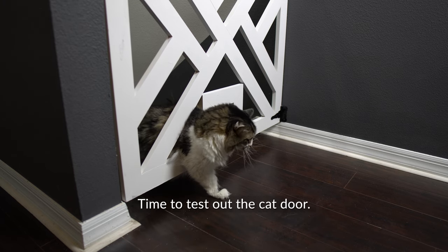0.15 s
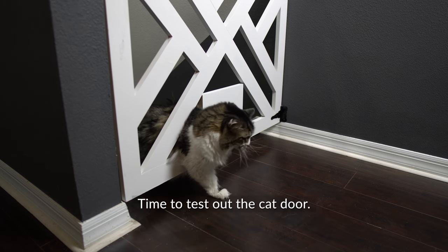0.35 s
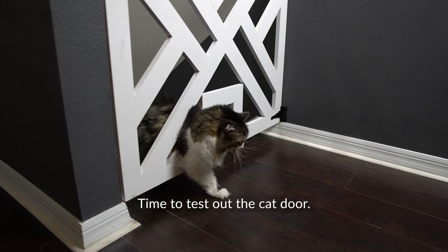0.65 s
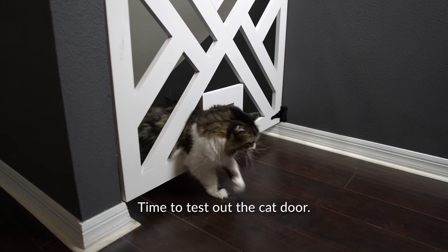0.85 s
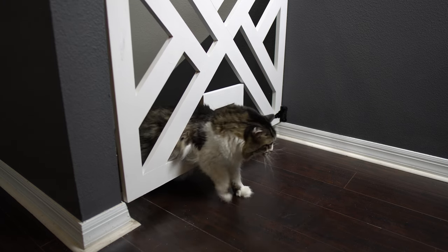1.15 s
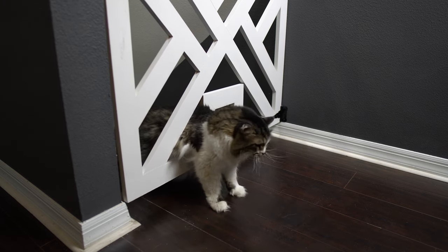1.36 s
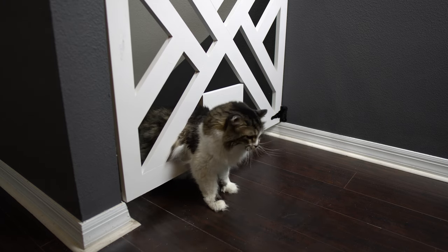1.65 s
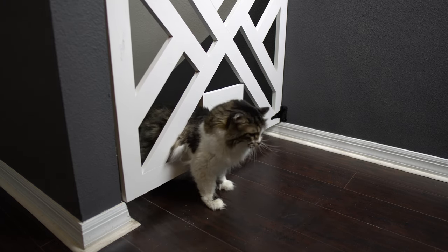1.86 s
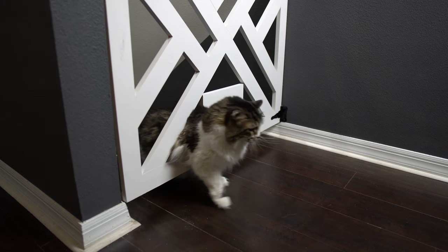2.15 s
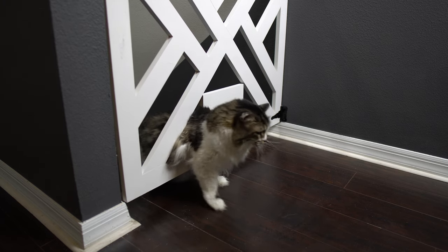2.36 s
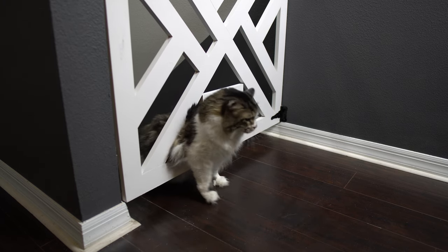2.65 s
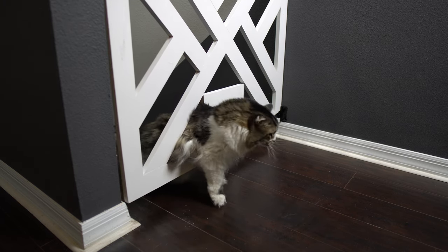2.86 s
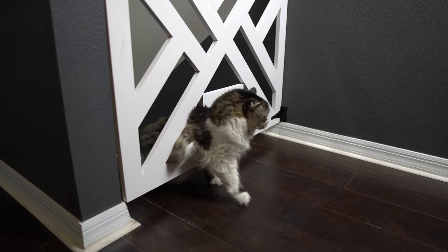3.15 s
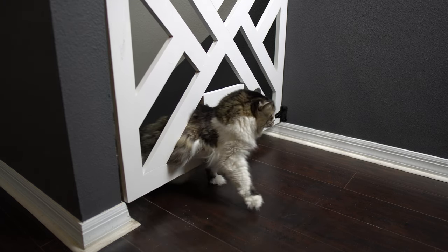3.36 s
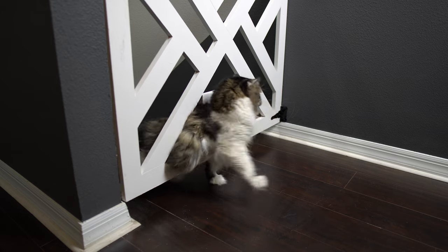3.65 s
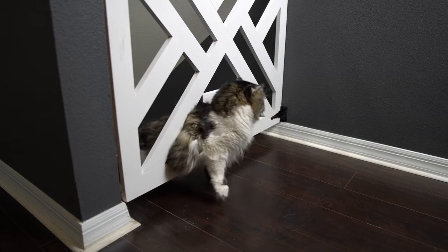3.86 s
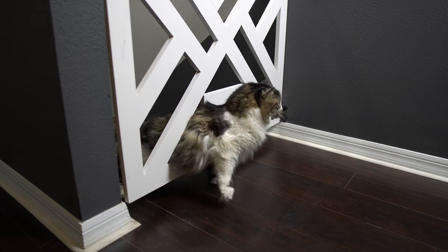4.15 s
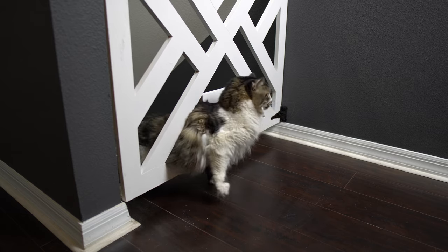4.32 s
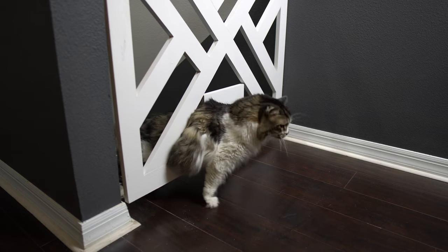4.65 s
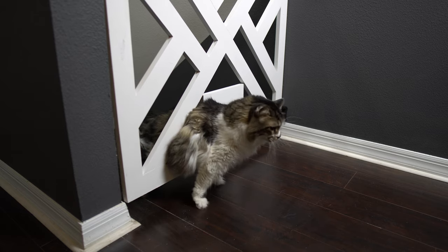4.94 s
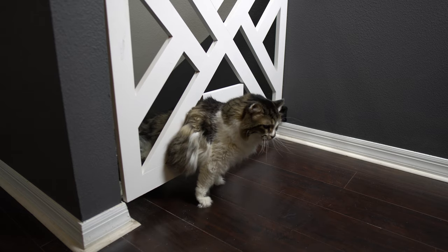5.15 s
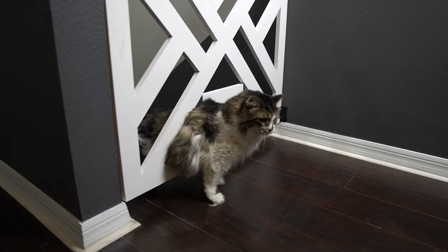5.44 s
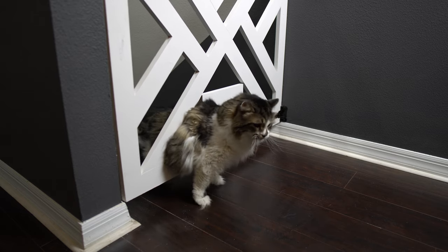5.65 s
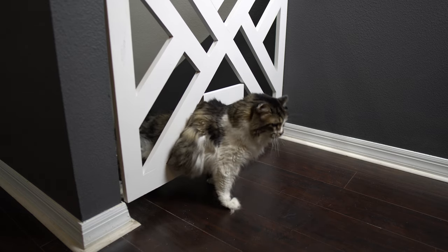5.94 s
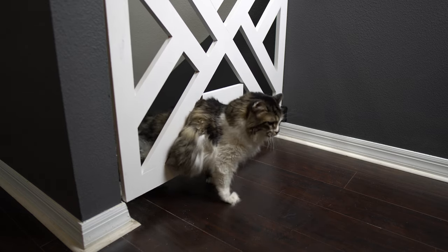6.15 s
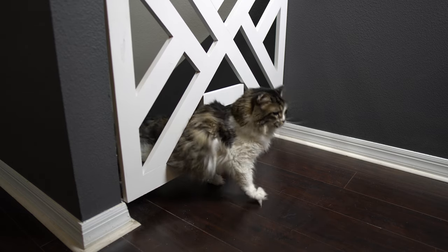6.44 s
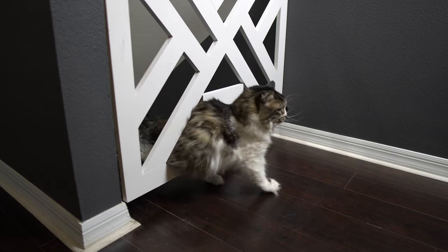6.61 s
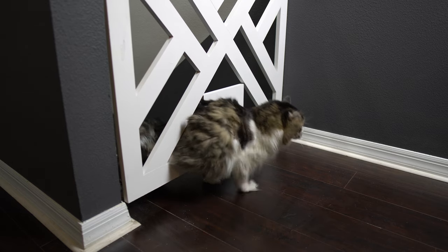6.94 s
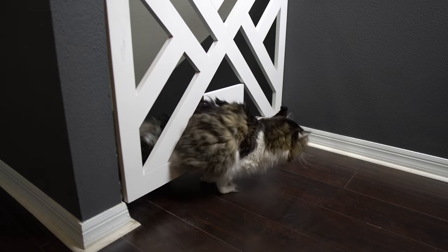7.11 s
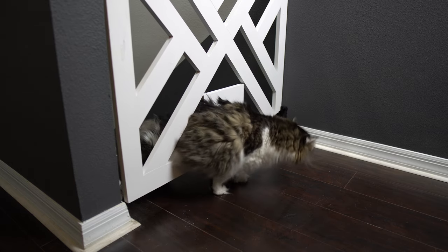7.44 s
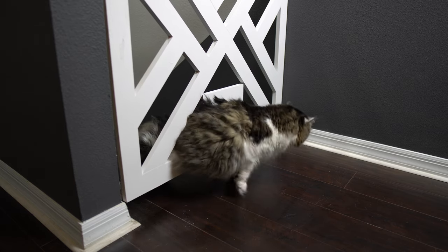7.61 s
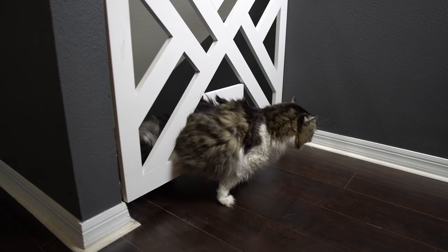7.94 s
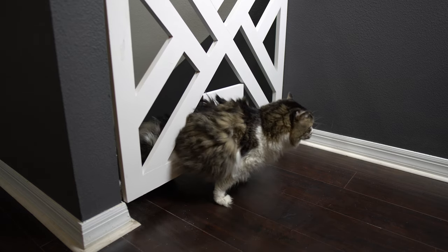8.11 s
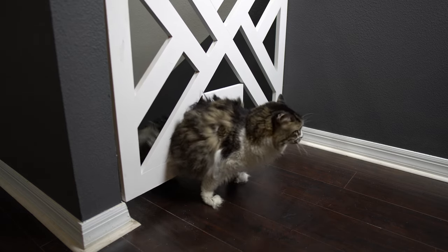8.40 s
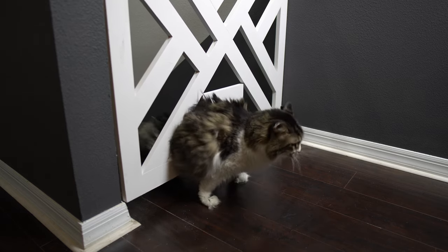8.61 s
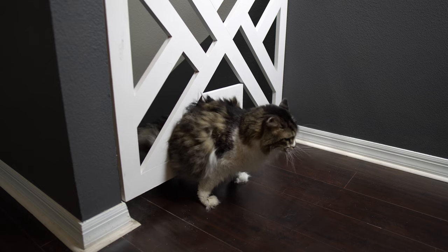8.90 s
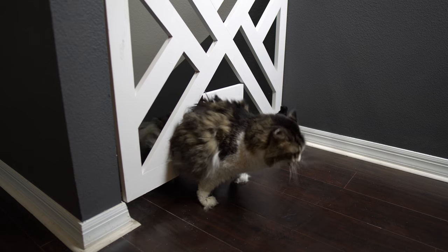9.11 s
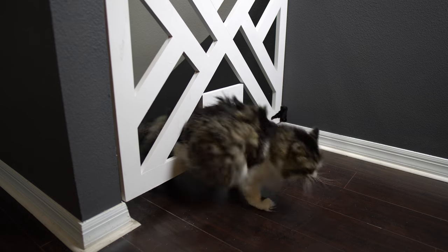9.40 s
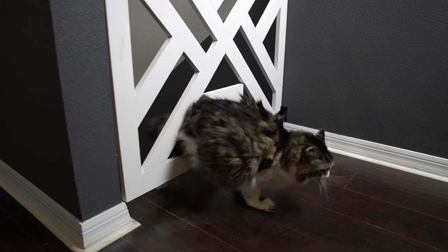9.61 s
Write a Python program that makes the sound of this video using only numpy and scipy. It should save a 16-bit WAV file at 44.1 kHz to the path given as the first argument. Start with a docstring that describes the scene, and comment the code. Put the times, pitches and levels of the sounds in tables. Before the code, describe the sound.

Crisp plastic-packet snaps and crackle close by, with light wooden gate knocks and soft fur brushes in a bare, humming hallway.

```python
"""A bare hallway with a hard floor, where a cat squeezes through a small door in a wooden gate.
Close by, crisp snaps, crackle and a rustle, as of a stiff plastic packet: cracks ringing in the film's bands.
Airy sweeps, as of fur on the frame, are runs of cracks that start quickly and fade; the gate's knocks
ring wooden modes.
The floor gives one quick echo, the hall answers late, and the house hums in shaped noise and narrow drones."""
import sys
import numpy as np
from scipy import signal
from scipy.fft import rfft, irfft, next_fast_len
from scipy.io import wavfile
from scipy.ndimage import uniform_filter1d, map_coordinates

SR = 44100
rng = np.random.default_rng(int(sys.argv[2]) if len(sys.argv) > 2 else 0)


def unload_wav(signal):
    """Save mono or channel-first audio to the path in sys.argv[1] as 16-bit WAV at rate SR, clipped to [-1, 1]."""
    wavfile.write(
        sys.argv[1],
        SR,
        np.round(np.clip(np.atleast_2d(signal).T, -1, 1) * 32767).astype(np.int16),
    )


N = 430857  # length in samples

# House hum, shape of the broad noise: pitch_hz [Hz], relative density_db [dB per Hz]
HUM_SHAPE = [(12, -38), (20, 1.5), (36, -8.5), (55, -11.5), (134, -10), (163, -14), (198, -10.5),
             (310, -20), (357, -17.5), (759, -25.5), (949, -29.5), (1030, -29.5), (1860, -34.5),
             (4060, -35), (16000, -59)]
# Narrow bands in the hum: pitch_hz [Hz], width_hz [Hz], level_db before the deep part is levelled [dB]
HUM_DRONES = [(53, 12.3, -55), (85.7, 7, -60.5), (198.2, 52, -60)]
# Swell and sinking of the lowest hum: time_s [s], level_db [dB]
DEEP_HUM_LEVEL = [(0, -50.5), (3.4, -52.5), (5.25, -50), (9.36, -51), (9.55, -44.5), (9.77, -49)]
HUM_DB = -50  # broad noise, before the deep part is levelled

# Bands of the stiff film, in rows low, body, body, bright, air: pitch_hz [Hz], width_hz [Hz], level_db [dB]
FILM_BANDS = [(1400, 1440, -17), (2700, 2940, -2.5), (3840, 2110, 3), (5740, 970, -2), (8530, 8300, -17.5)]
# How busily the packet is handled: time_s [s], level_db of the crisp bands [dB]
HANDLING_LEVEL = [(0, -83), (1.2, -71.5), (2.2, -74), (2.35, -51.5), (2.7, -67), (3.4, -71.5), (3.6, -55),
                  (3.9, -64.5), (4.55, -75.5), (5.3, -49.5), (5.42, -72), (5.62, -52.5), (5.95, -48),
                  (6.18, -62), (6.35, -56), (6.46, -58), (6.65, -51.5), (6.95, -54), (7.6, -70),
                  (8.35, -59.5), (8.95, -62), (9.3, -56.5), (9.77, -62.5)]
RUSTLE_LOW_DB = -9  # low band against the crisp bands

# Decay of the hall: pitch_hz [Hz], t60_s [s]
HALL_DECAY = [(200, 0.62), (1000, 0.64), (3500, 0.57), (6000, 0.58), (12000, 0.25)]
# Colour of the hall's answer: pitch_hz [Hz], level_db [dB]
HALL_TONE = [(300, 12), (2000, 0), (3700, 2.5), (5700, -3), (10000, -0.5)]

# Wooden modes, the frame's thump first: pitch_hz [Hz], width_hz when free [Hz], level_db [dB]
GATE_MODES = [(124, 47, -1), (304, 26, -18), (383, 25, -8), (494, 19.7, 3), (538, 78, -2.5), (633, 33, -12),
              (670, 23, -6.5), (856, 32, -4.5), (960, 165, -8), (1400, 860, -18)]
# Knocks of the gate: start_s [s], peak_db [dB], rattle_ms [ms], thump_db added to the first mode [dB],
# damping, how much the leaning cat widens the modes [factor]
GATE_KNOCKS = [(0.0866, -38, 2.8, -8, 2.2), (2.356, -24, 7.6, -4, 1.54), (2.363, -26, 17, -10, 2.4),
               (2.39, -31.5, 25, 5, 2.7), (3.624, -29, 59, -16, 2.3), (3.669, -29, 18, -19, 2.5),
               (3.989, -43, 36, -21, 3.1), (5.041, -37.5, 20, -7, 1.7), (5.165, -34.5, 30, -8, 2.2),
               (5.771, -37.5, 9.2, -3, 1.7), (5.87, -35.5, 24, -6, 1.4), (6.481, -34, 6.6, -12, 1.6),
               (7.3459, -27, 2.2, -8, 2.34)]
GATE_HALL_DB = -4.5  # hall feed of the free gate

# Single creases: start_s [s], strength_db [dB], fold_hz [Hz], low_db and bright_db against the body [dB]
CREASE_SNAPS = [(0.0871, -20.5, 1250, 3, -11), (1.268, -25, 2250, 9, -20), (1.293, -21.5, 2640, -25, -22),
                (1.4094, -19, 2240, 1, -11), (1.46, -19, 2670, -20, -10), (1.4968, -19.5, 2610, 3, 3.5),
                (1.8228, -19, 2480, 0, -15), (1.862, -15.5, 2520, -6, -7), (1.9122, -15.5, 1440, -30, 2.5),
                (2.028, -3, 2620, -3.5, -5.5), (2.0889, -3, 2700, 0.5, -5.5), (2.3628, -3, 1160, -23, 6.5),
                (2.533, -22.5, 2280, 17, -29), (3.5835, -23, 1640, -4, -1), (3.6256, -1.5, 1470, -22, 4),
                (3.6615, -9.5, 1820, -4, 7.5), (3.6931, 0, 1680, 3, -5), (3.7508, -9, 1410, 7.5, -19),
                (3.9914, -20, 2590, -28, -34), (4.412, -35.5, 1400, 21.5, -20),
                (4.6028, -4.5, 2600, -3, -35), (4.786, -9.5, 1920, -3, -4.5), (4.89, -13.5, 1980, 1, 1),
                (4.999, -7.5, 2750, -31, -22), (5.0434, -6, 1500, -5.5, -2), (5.064, -4, 1940, -26, 1),
                (5.1699, -0.5, 2070, -3.5, 7), (5.177, -12.5, 2260, -15, 11), (5.44, -6.5, 1800, 4.5, 3.5),
                (5.676, -5, 2540, -9, -9), (5.7129, 9.5, 2740, -2, -3.5), (5.938, -10.5, 1980, 2.5, 0),
                (5.987, -5, 2610, -14, 7.5), (6.001, -6.5, 1670, 10.5, 1.5), (6.21, -12.5, 2700, 10.5, 7),
                (6.246, -12, 2310, -2, 10), (6.2577, 2, 2130, -1.5, 5.5), (6.4827, 2, 2350, 2, 1),
                (6.5151, -5, 1990, -2, -7), (6.591, 1.5, 2700, -6, -28), (6.6414, -9, 2560, 4.5, -21),
                (6.69, -8.5, 2600, -23, 0.5), (7.2043, -31, 1670, 25, -17), (7.3454, -25, 2920, 17.5, -22),
                (7.801, -20.5, 2340, 0, 2), (7.948, -15, 2780, 9, -29), (8.2392, -19.5, 2300, 2, -20),
                (8.5226, -27, 1450, 17.5, -18), (8.6669, -10.5, 1150, 0, 6.5), (9.0761, 2, 1550, -8, -2),
                (9.27, -12.5, 1960, -3, -1), (9.3129, -12.5, 2640, 3.5, -16), (9.576, -9.5, 5600, 6.5, -14),
                (9.644, -14, 1930, 8.5, -24), (9.7614, -14.5, 2050, 3, -25)]
SNAP_HALL_DB = -12.5  # hall feed of a snap of strength 0 dB
HALL_LAGS = 0.089  # dB of feed lost for each dB of strength, as loud snaps are the near ones

# Airy sweeps, as of fur brushing the frame: start_s [s], length_ms [ms], level_db [dB]
FUR_SWEEPS = [(0.969, 230, -62), (2.854, 57, -47), (4.03, 310, -60), (5.377, 14, -45.5),
              (6.215, 136, -49.5), (6.7, 270, -66), (7.08, 53, -50), (7.28, 120, -57), (7.777, 40, -53.5),
              (7.9, 86, -55), (8.989, 76, -60), (9.3, 150, -58)]
# Colour of every sweep: fold_hz [Hz], low_db, bright_db and air_db against the body [dB]
SWEEP_COLOUR = (1800, -1, -5, -7.5)
SWEEP_RISE, SWEEP_HALL_DB = 0.051, -2  # share of the length spent rising; hall feed

# Runs of crackle: start_s [s], length_ms [ms], rise_share of the length [0-1], level_db [dB],
# fold_hz [Hz], low_db and bright_db against the body [dB]
CRACKLE_RUNS = [(2.04, 51, 1, -34, 1900, -9, -15), (2.338, 11.3, 0.14, -39.5, 1090, 6, 2),
                (2.356, 5.4, 0.057, -32.5, 1100, -9, 18), (2.392, 28, 0.23, -30.5, 1570, -6, 2),
                (3.626, 40, 0.046, -36.5, 1500, -3, -10), (3.664, 29, 0.068, -26.5, 1780, -28, -6.5),
                (4.668, 51, 0.27, -41.5, 1490, -1.5, 0), (4.999, 83, 0.04, -37.5, 1640, -2.5, -5),
                (5.158, 7.1, 0.033, -17.5, 2700, -1, -7), (5.454, 22, 0.025, -29.5, 3620, 4, 0),
                (5.594, 8.4, 0.73, -25.5, 1400, 0, -5), (5.867, 30, 0.095, -33, 1550, 1.5, -1),
                (5.988, 15.5, 0.12, -26.5, 1930, -2, -10), (6.111, 19, 0.11, -36, 1520, 1, 1),
                (6.211, 36, 0.093, -33, 2480, -7, -6), (6.28, 97, 0.24, -43.5, 3240, 12, -15),
                (6.484, 33, 0.14, -25.5, 2270, -13, -5), (6.581, 10.6, 0.21, -20.5, 2630, 5, -4.5),
                (6.77, 69, 0.28, -52.5, 2880, 17.5, -16), (6.932, 46, 0.55, -49, 3300, 12, -15),
                (7.069, 58, 0.38, -40, 3300, 8.5, -7), (7.91, 54, 0.58, -36.5, 2440, -2.5, -33),
                (8.059, 64, 0.24, -55, 1470, 15.5, -22), (8.415, 34, 0.22, -37, 3460, 7, -5),
                (8.45, 29, 0.14, -34, 1740, -8.5, -8), (8.635, 35, 0.073, -37.5, 1700, -15, 7),
                (8.71, 130, 0.25, -48, 4430, 10.5, -18), (9.076, 5.5, 0.041, -20.5, 4270, -1.5, -13),
                (9.485, 8, 0.26, -33.5, 2370, 6, -14)]
CRACKLE_HALL_DB, CRACKLE_AIR_DB = -11, -13.5  # hall feed; air band at a bright band of 0 dB
AIR_FOLLOWS = 0.13  # dB of air for each dB of the bright band
RUN_SPIKY_DB = 7.5  # scatter in the size of the cracks in sweeps and crackle

# Microphone response: pitch_hz [Hz], level_db [dB]
MIC_RESPONSE = [(3000, 0.5), (4300, -0.5), (4900, -5), (5700, -3), (7000, -3.5), (11000, -8), (14000, -11),
                (16000, -17)]
TOP_HZ = 16000  # band limit of the recorder


def amp(db):
    """Gain of a level in dB."""
    return 10 ** (np.asarray(db) / 20)


def unit(x):
    """x at rms 1."""
    return x / np.sqrt(np.mean(x ** 2) + 1e-20)


def along(points, hz):
    """Reads (Hz, value) points on a log frequency axis."""
    f, value = np.transpose(points)
    return np.interp(np.log(hz + 1), np.log(f + 1), value)


def over_time(points):
    """Reads (s, value) points at every sample."""
    return np.interp(np.arange(N) / SR, *np.transpose(points))


def filtered(x, response):
    """Multiplies the spectrum of x by a complex response of frequency."""
    size = next_fast_len(len(x) + 8192)  # padding for the ring
    return irfft(rfft(x, size) * response(np.fft.rfftfreq(size, 1 / SR)), size)[:len(x)]


def resonance(f, hz, width, db):
    """One causal resonance, db at its peak."""
    return amp(db) * 1j * f * width / (hz * hz - f * f + 1j * f * width)


def steep(f, hz, width, db):
    """A resonance applied twice, for dark skirts."""
    return resonance(f, hz, width, db) * resonance(f, hz, width, 0)


def cracks(count, spiky_db):
    """A stream of tiny cracks of very uneven size, rms 1."""
    sizes = amp(spiky_db * rng.standard_normal(count))
    return unit(rng.standard_normal(count) * sizes)


def burst(ms, count, spiky_db, share):
    """A first crack, then smaller ones that die away over ms."""
    decay = np.exp(-1000 * np.arange(count) / SR / max(ms, .1))
    x = share * cracks(count, spiky_db) * decay
    x[0] = 1
    return x


def empty_paths():
    """Silent direct sound and hall feed, with a second to spare for the last tails."""
    return np.zeros(N + SR), np.zeros(N + SR)


def add(near, feed, start_s, direct, far):
    """Lays one sound into the direct path and the hall feed."""
    start = round(start_s * SR)
    near[start:][:len(direct)] += direct
    feed[start:][:len(far)] += far


def hum():
    """House rumble is shaped noise with a few narrow drones and faint hiss; only the lowest part wavers."""
    broad = unit(filtered(rng.standard_normal(N), lambda f: amp(along(HUM_SHAPE, f))))
    steady = amp(HUM_DB) * broad
    for hz, width, db in HUM_DRONES:
        drone = filtered(rng.standard_normal(N), lambda f: steep(f, hz, width, 0))
        steady += amp(db) * unit(drone)
    deep = filtered(steady, lambda f: 1 / (1 + (f / 110) ** 6))
    return steady - deep + amp(over_time(DEEP_HUM_LEVEL)) * unit(deep)


def film(fold_hz, low_db, bright_db, air_db):
    """The bands in which the stiff film rings; the low one depends on the size of the fold."""
    _, body, top, bright, air = FILM_BANDS

    def response(f):
        fold = resonance(f, fold_hz, 0.4 * fold_hz, 0) / (1 + 1j * f / (1.76 * fold_hz)) ** 2
        # the signs alternate from band to band
        return (amp(low_db + 5) * fold - steep(f, *body) + steep(f, *top)
                - amp(bright_db + 8.5) * steep(f, *bright) + amp(air_db + 23.5) * steep(f, *air))
    return response


def rustle():
    """Dense tiny cracks in clumps ring the film's bands, and their colour shifts in patches."""
    clumps = map_coordinates(rng.standard_normal(N // 500 + 4), [np.arange(N) / 500])
    stream = cracks(count=N, spiky_db=7.5) * amp(3.27 * clumps)
    z = signal.stft(stream, nperseg=256)[2]
    patches = uniform_filter1d(rng.standard_normal(z.shape), size=5, axis=0)  # across pitch
    patches = uniform_filter1d(patches, size=16, axis=1)  # across time
    stream = signal.istft(z * amp(1.8 * unit(patches)), nperseg=256)[1][:N]
    low = unit(filtered(stream, lambda f: resonance(f, *FILM_BANDS[0])))
    crisp = unit(filtered(stream, film(1490, -15.5, -6.5, -16.5)))
    return amp(over_time(HANDLING_LEVEL)) * (crisp + amp(RUSTLE_LOW_DB) * low)


def floor_echo(x, ms=4.1, db=-4, dull_hz=4600):
    """The hard floor returns one delayed copy, dulled above dull_hz."""
    def bounce(f):
        delay = np.exp(-2j * np.pi * f * ms / 1000)
        return amp(db) * delay / (1 + (f / dull_hz) ** 6) ** .5
    return x + filtered(x, bounce)


def hall(x, rise_ms=25, count=5):
    """The far walls answer late, so the noise tail swells first, then decays by pitch.
    Five noise tails take turns every 0.2 s, for variety."""
    out = np.zeros(N)
    turn = np.arange(N) // (SR // 5) % count
    for k in range(count):
        hz, t, z = signal.stft(rng.standard_normal(SR), SR, nperseg=256)
        decay_db = along(HALL_TONE, hz)[:, None] - 60 * t / along(HALL_DECAY, hz)[:, None]
        swell = 1 - 0.43 * np.exp(-(1000 * t / rise_ms) ** 2)
        tail = signal.istft(z * amp(decay_db) * swell, SR, nperseg=256)[1]
        out += signal.fftconvolve(x * (turn == k), tail / np.linalg.norm(tail))[:N]
    return out


def gate():
    """The loose gate rattles briefly and rings its wooden modes; returns direct sound and hall feed."""
    near, feed = empty_paths()
    for start_s, peak_db, rattle_ms, thump_db, damping in GATE_KNOCKS:
        def wood(f):
            modes = 0
            for k, (hz, width, db) in enumerate(GATE_MODES):
                modes = modes + (-1) ** k * resonance(f, hz, damping * width, db + thump_db * (k == 0))
            return modes / (1 + 1j * f / 2500)  # a soft contact
        knock = filtered(burst(rattle_ms, count=16384, spiky_db=5, share=0.11), wood)
        knock = amp(peak_db) * knock / np.abs(knock).max()
        far = amp(GATE_HALL_DB) * knock / damping  # a held gate sends less into the hall
        add(near, feed, start_s, knock, far)
    return near[:N], feed[:N]


def snaps():
    """A crease snaps as a short burst of cracks in the film; returns direct sound and hall feed."""
    near, feed = empty_paths()
    for start_s, db, fold_hz, low_db, bright_db in CREASE_SNAPS:
        air_db = 1.17 * bright_db - 19  # sharp snaps reach higher
        colour = film(fold_hz, low_db, bright_db, air_db)
        snap = burst(1.75, count=2048, spiky_db=2.5, share=0.21)
        direct = amp(db) * filtered(snap / np.linalg.norm(snap), colour)
        click = np.arange(len(snap)) == 0  # the hall is fed one coloured click, which gives a smooth tail
        hall_db = SNAP_HALL_DB - HALL_LAGS * db
        add(near, feed, start_s, direct, amp(db + hall_db) * filtered(click, colour))
    return near[:N], feed[:N]


def crack_run(near, feed, start_s, ms, rise, db, colour, hall_db):
    """A run of cracks rises, sags and stops, laid into the direct path and the hall feed."""
    u = 1000 * np.arange(SR // 2) / SR / ms  # time in lengths of the run
    stroke = np.minimum(u / rise, 1) ** 2 * np.exp(-.7 * np.maximum(u - rise, 0) - u ** 6)
    run = stroke * cracks(count=len(u), spiky_db=RUN_SPIKY_DB)
    run *= np.linalg.norm(stroke) / np.linalg.norm(run)  # the energy of the smooth stroke
    run = amp(db) * filtered(run, colour)
    add(near, feed, start_s, run, amp(hall_db) * run)


def sweeps():
    """Airy runs of cracks share one colour and a quick rise; returns direct sound and hall feed."""
    near, feed = empty_paths()
    for start_s, ms, db in FUR_SWEEPS:
        crack_run(near, feed, start_s, ms, SWEEP_RISE, db, film(*SWEEP_COLOUR), SWEEP_HALL_DB)
    return near[:N], feed[:N]


def crackle():
    """Runs of creases crackle, each in its own fold colour; returns direct sound and hall feed."""
    near, feed = empty_paths()
    for start_s, ms, rise, db, fold_hz, low_db, bright_db in CRACKLE_RUNS:
        air_db = CRACKLE_AIR_DB + AIR_FOLLOWS * bright_db
        colour = film(fold_hz, low_db, bright_db, air_db)
        crack_run(near, feed, start_s, ms, rise, db, colour, CRACKLE_HALL_DB)
    return near[:N], feed[:N]


def scene():
    """Packet and sweeps with their floor echo, and the gate, all in the hall over the hum."""
    handling = rustle()
    knock, knock_feed = gate()
    snap, snap_feed = snaps()
    sweep, sweep_feed = sweeps()
    run, run_feed = crackle()
    close = snap + sweep + run + handling
    wet = amp(9) * (snap_feed + sweep_feed + run_feed) + amp(3) * handling + knock_feed
    return (hum() + floor_echo(close) + knock + hall(wet))[None]


def record(dry):
    """The microphone port colours the treble, the amplifier hisses, and a band limit cuts the top."""
    hiss = amp(-72) * filtered(rng.standard_normal(N), lambda f: 1 / (1 + f / 9000))
    coloured = filtered(dry[0], lambda f: amp(along(MIC_RESPONSE, f)))
    return filtered(coloured + hiss, lambda f: f < TOP_HZ)[None]


dry = scene()
out = record(dry)
unload_wav(out)
```